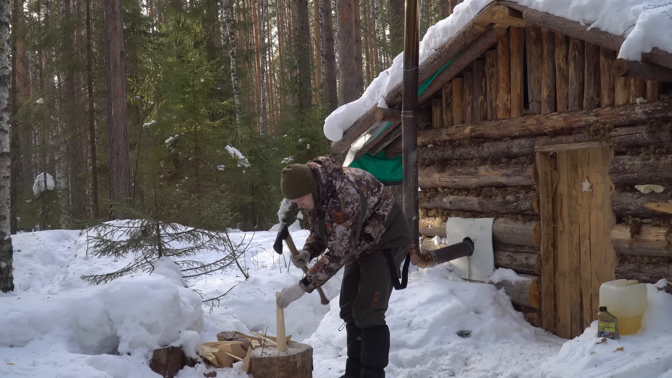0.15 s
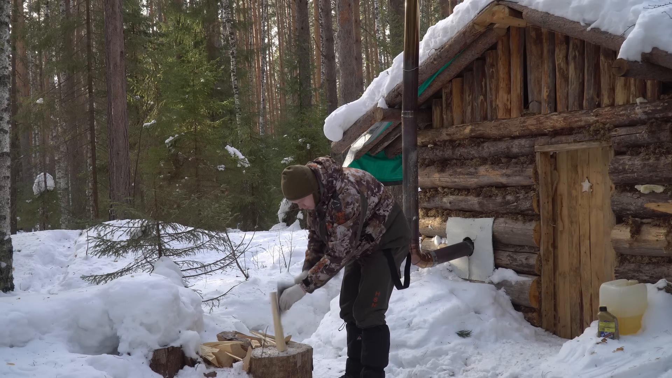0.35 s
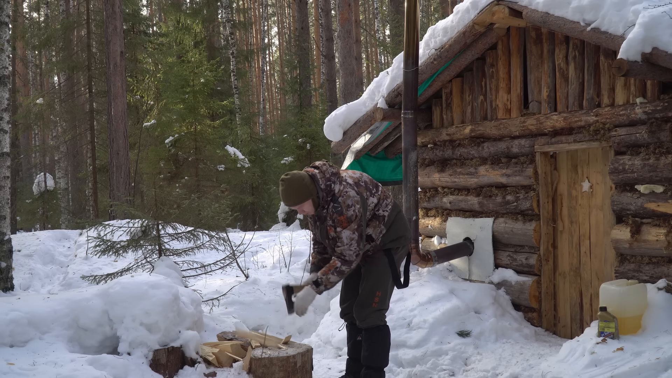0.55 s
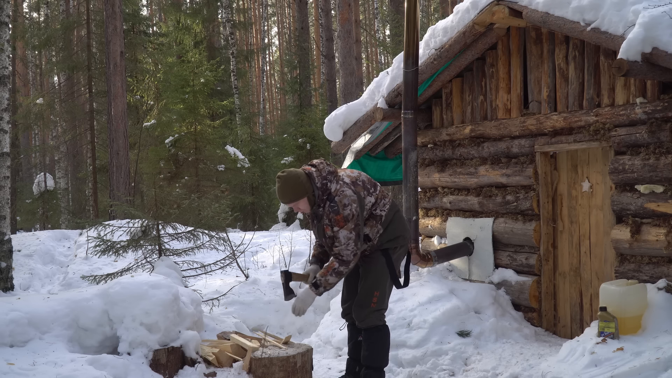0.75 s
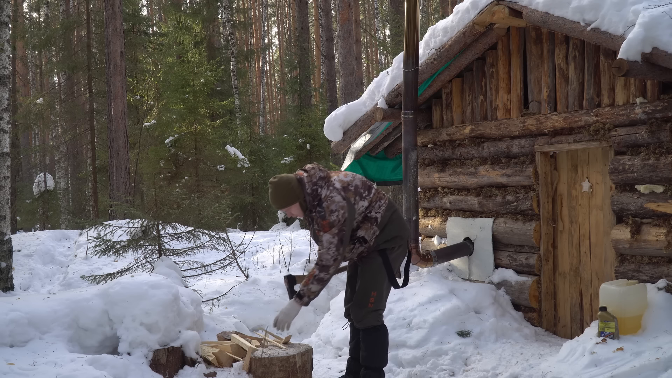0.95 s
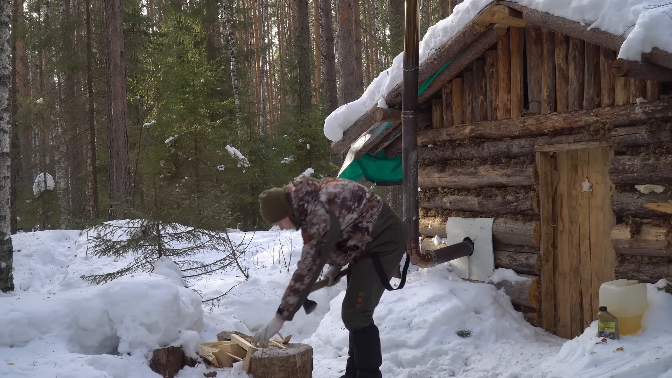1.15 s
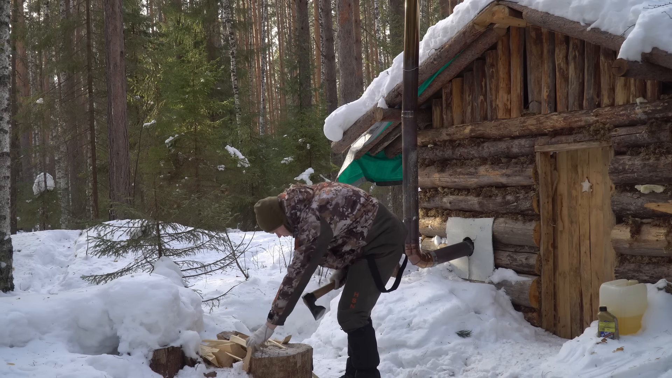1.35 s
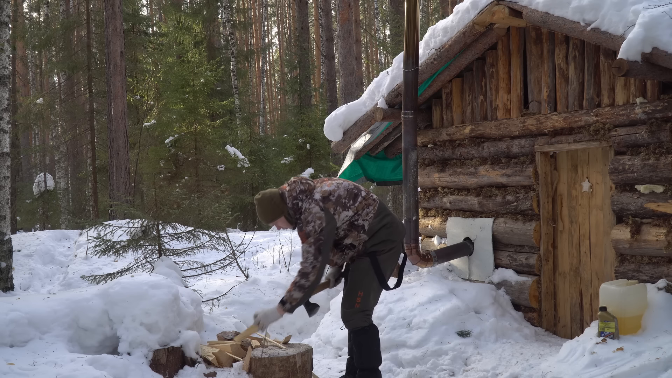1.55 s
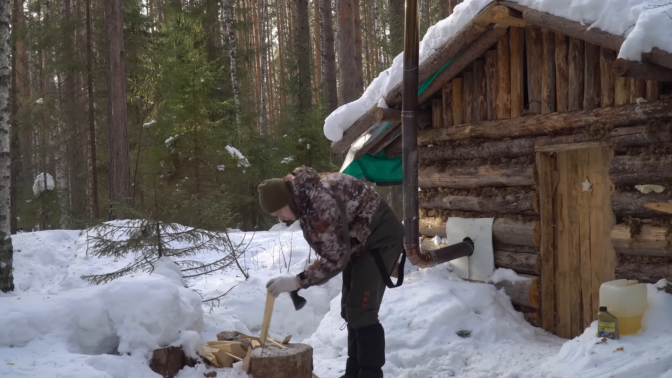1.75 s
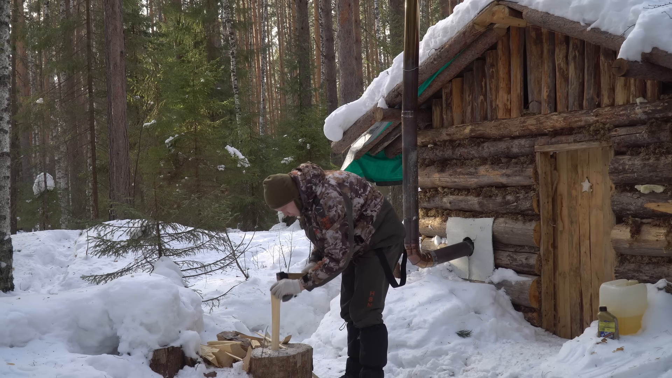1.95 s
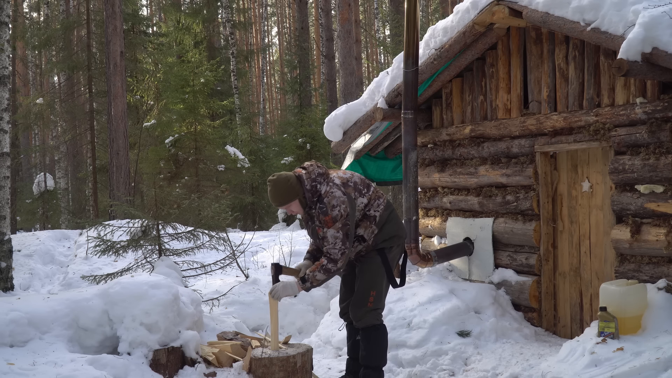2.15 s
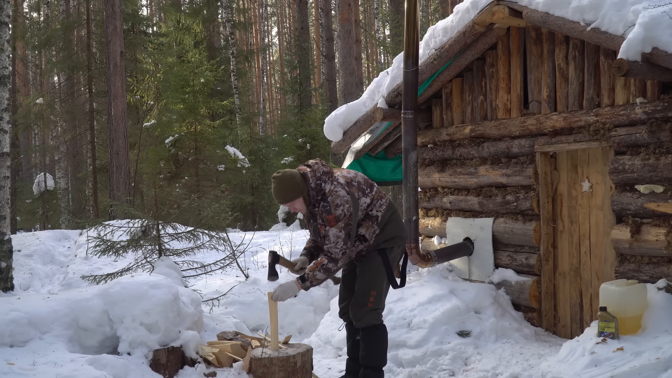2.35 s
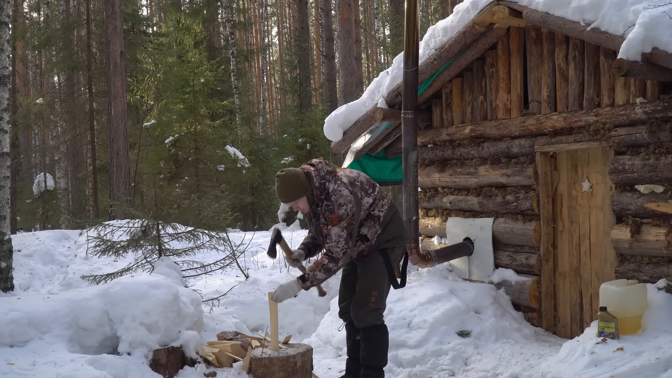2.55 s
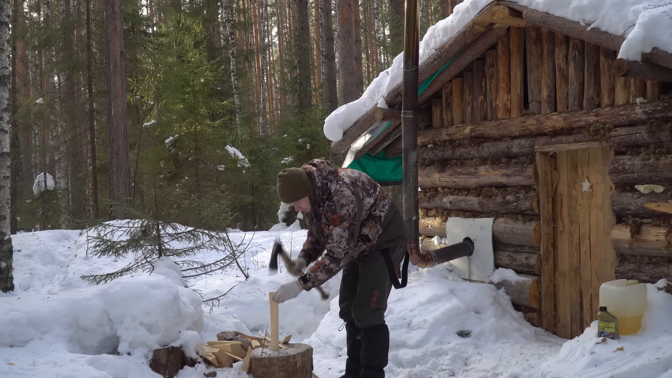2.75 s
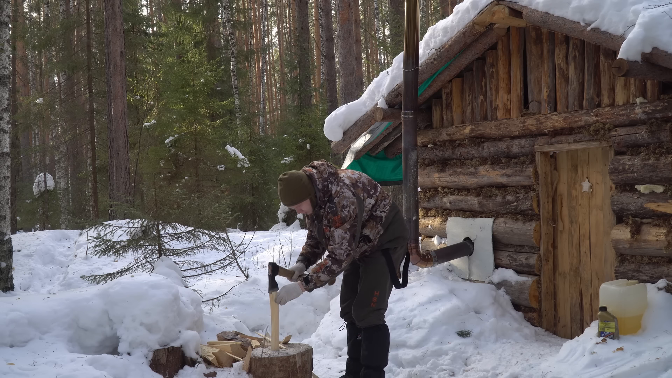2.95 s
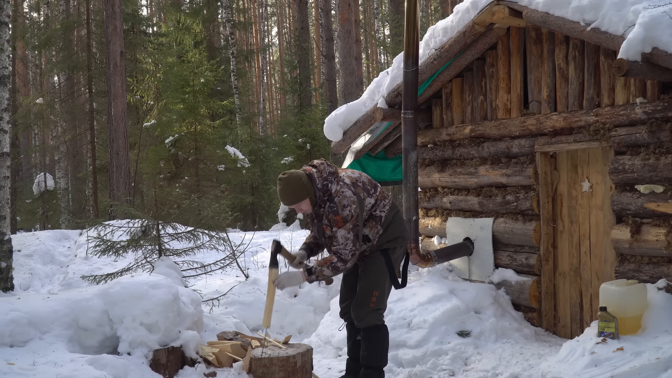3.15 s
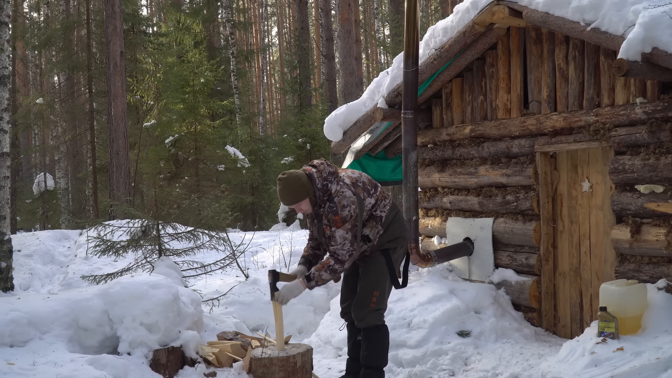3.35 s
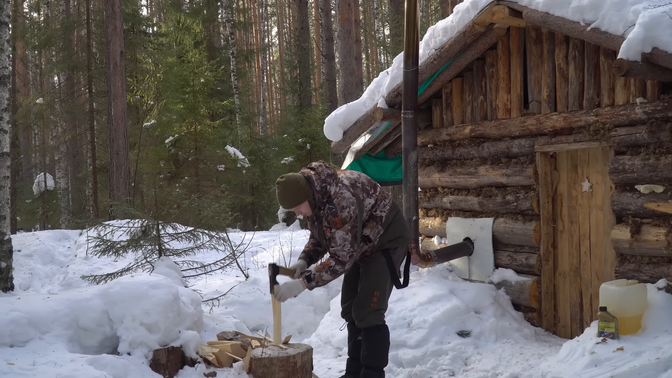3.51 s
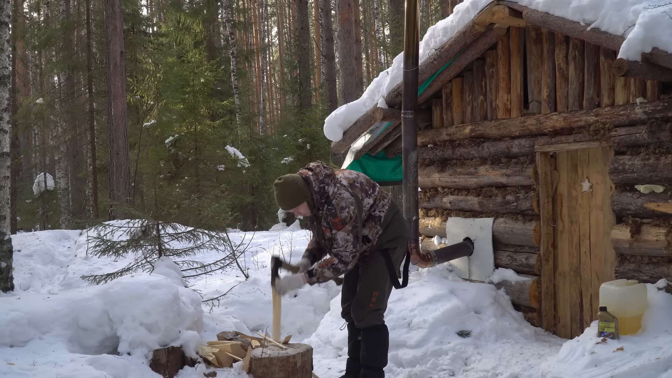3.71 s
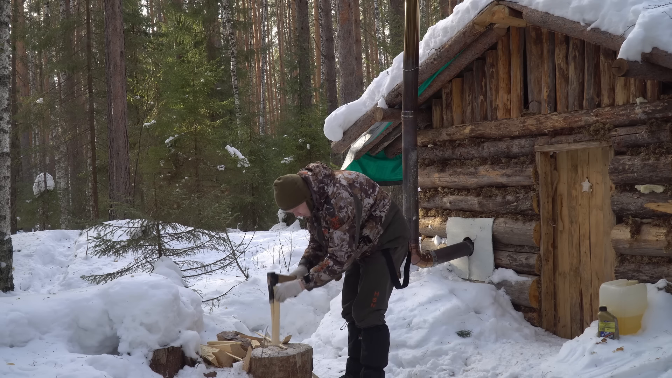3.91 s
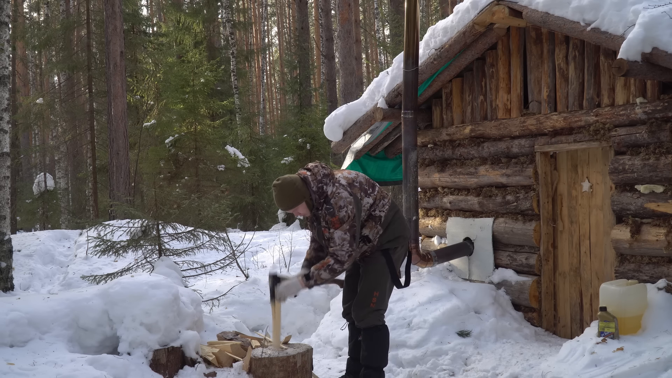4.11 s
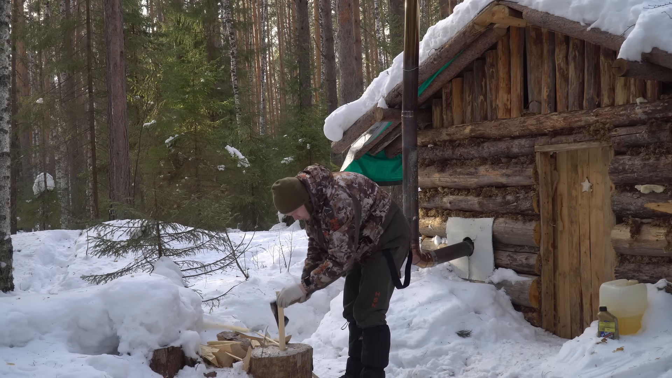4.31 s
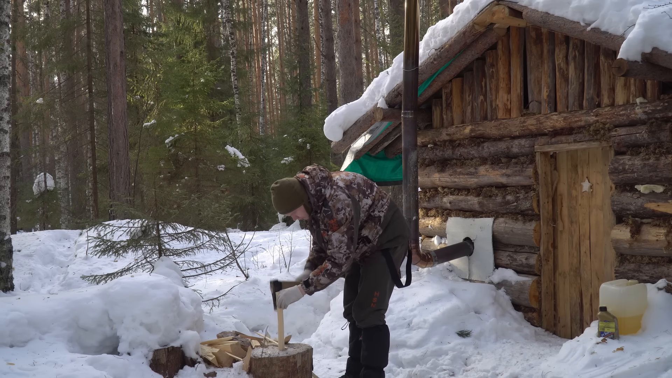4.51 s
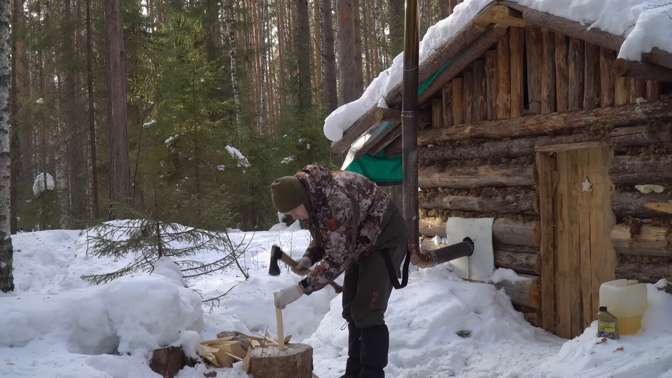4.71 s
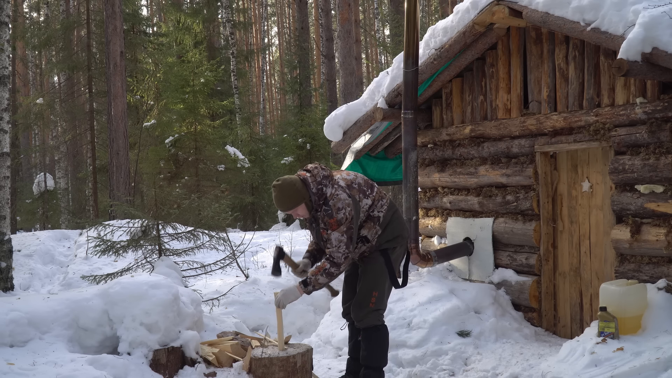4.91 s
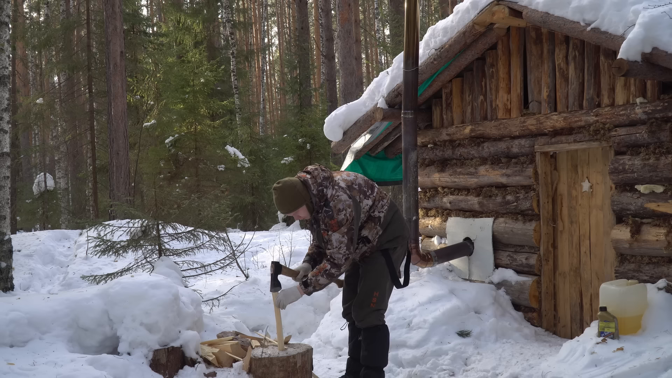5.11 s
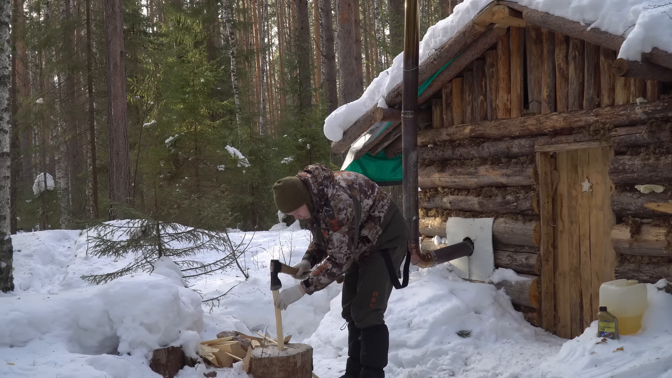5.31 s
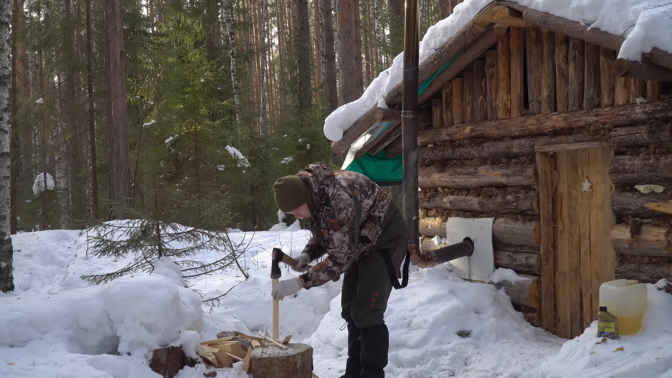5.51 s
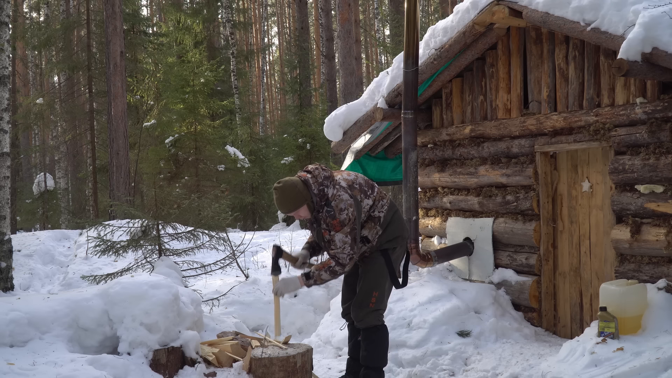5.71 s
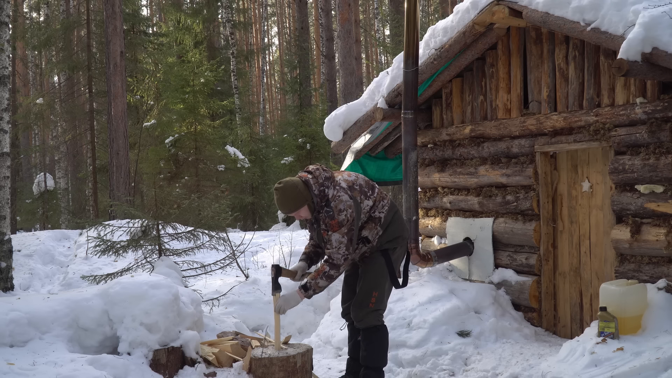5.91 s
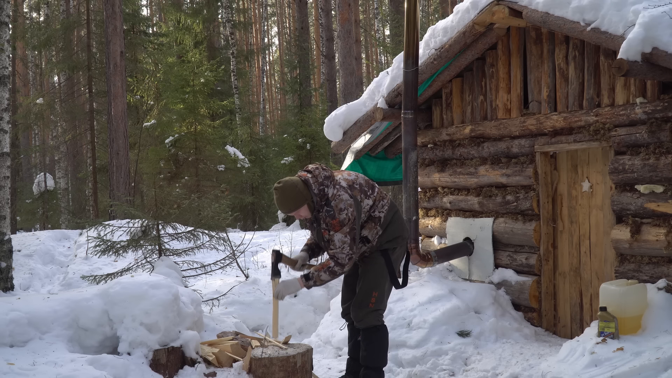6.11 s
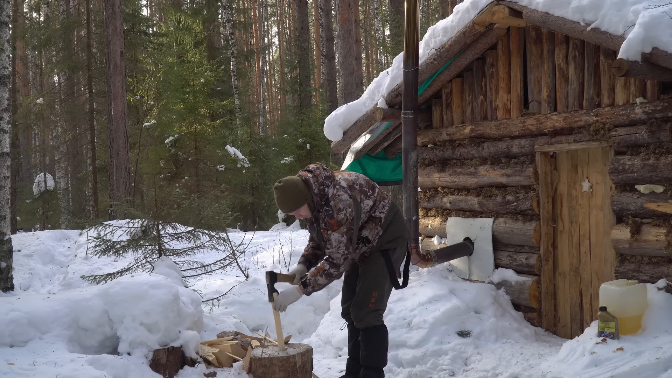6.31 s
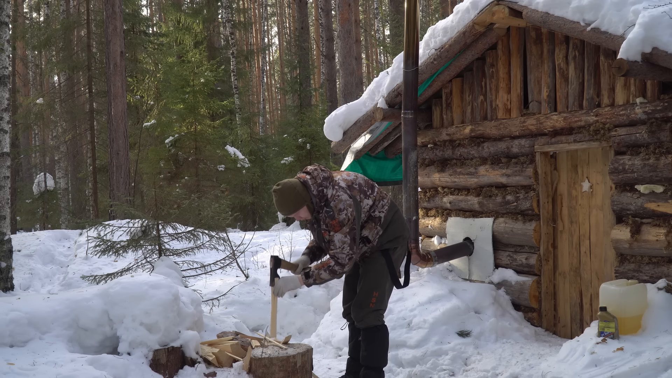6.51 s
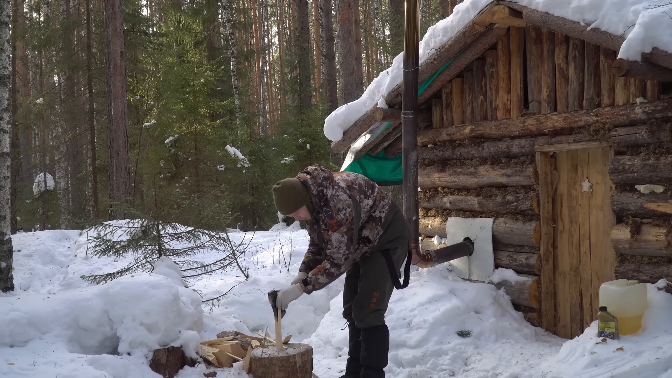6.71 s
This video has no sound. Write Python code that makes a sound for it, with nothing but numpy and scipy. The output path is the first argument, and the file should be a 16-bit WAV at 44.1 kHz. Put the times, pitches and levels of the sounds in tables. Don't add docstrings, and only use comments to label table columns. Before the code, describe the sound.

A still winter forest, with a far soft hush, faint low breeze and the tail of an earlier echo. Slight wood scrapes and clicks open; at 0.4 s a hatchet splits a stick with a dry crack and short woody ring. At 0.7 to 1.1 s pieces land on the pile, clacking and bouncing with clear, hollow notes. Cloth rubs and stiff gloves crease until about 2.3 s, with a small scrape near 1.6 s. Heavy blows come at 2.9, 3.4, 3.85 and 4.2 s: block thuds under sharp fibre snaps, the last bursting apart. Sticks rattle and ring to 4.6 s, followed by a brief scrape. A light, dull tap falls at 5.1 s. Brittle tearing blows hit at 5.9, 6.3 and 6.7 s, with quick extra cracks. Trunks scatter thin echoes after each. The microphone is several steps off.

```python
import sys
import numpy as np
from scipy import signal
from scipy.io import wavfile

SR = 44100
rng = np.random.default_rng(int(sys.argv[2]) if len(sys.argv) > 2 else 0)


def to_wav(sig):
    pcm = np.clip(np.atleast_2d(sig), -1, 1) * 32767
    pcm = np.round(pcm).astype(np.int16)
    wavfile.write(sys.argv[1], SR, pcm.T)


def attenuation_scalar(level_db):
    decades = np.asarray(level_db, float) / 20
    return 10 ** decades


N = 302526

# pitch_hz, level_db (per Hz)
HUSH_SPECTRUM = [(29, -32), (50, -2), (91, -4.5), (167, -5), (284, -2), (362, -1.5), (729, 0),
                 (1960, -12.5), (2490, -21), (5020, -25.5), (7210, -34), (12900, -38.5), (14900, -40.5),
                 (16000, -41)]
HUSH_LEVEL_DB = -54.5
# pitch_hz, level_db (per Hz)
RUSTLE_SPECTRUM = [(1180, -27.5), (2000, 4), (2300, -4), (3460, -3), (6640, -13.5), (13900, -21),
                   (16000, -16.5)]
# time_s, level_db
RUSTLE_LOUDNESS = [(0.0, -69), (0.3, -84), (0.76, -63.5), (0.86, -70), (1.07, -68), (1.28, -64.5),
                   (1.51, -65.5), (1.81, -67), (2.2, -70.5)]
# time_s, level_db
WIND_LOUDNESS = [(0.0, -60), (0.55, -71), (1.03, -68), (2.52, -59), (3.13, -71), (3.59, -57), (4.41, -61.5),
                 (4.79, -53), (5.88, -61), (6.86, -71)]
OLD_ECHO_DB, OLD_ECHO_T60_S = -59.5, 0.65

# start_s, length_s, pitch_hz, width_hz, level_db
SCRAPES = [(0, 0.12, 4150, 250, -66), (0.028, 0.094, 566, 81, -60), (0.193, 0.045, 2600, 200, -67),
           (0.202, 0.13, 3950, 200, -73), (0.282, 0.14, 5400, 300, -89), (1.559, 0.093, 3400, 200, -63.5),
           (1.564, 0.056, 6300, 150, -70), (1.6, 0.084, 5080, 200, -70), (1.638, 0.048, 6200, 200, -75),
           (4.656, 0.19, 1470, 60, -62.5)]

# start_s, click_db, pitch_hz
CHIP_CLICKS = [(0.032, -53, 3320), (0.077, -43.5, 2610), (0.203, -48, 4100), (.228, -55, 2600),
               (0.262, -51.5, 3960), (0.285, -62, 3900), (.333, -54, 3960), (.648, -38.5, 5070),
               (0.8, -41, 4700), (.952, -67, 4640), (1.174, -43, 4370), (1.588, -52, 6200),
               (2.069, -54, 4890), (3.99, -50.5, 4900), (4.595, -51, 5000), (4.61, -52, 6300),
               (4.659, -66, 3560), (4.718, -49, 4500), (5.52, -64, 4440), (6.125, -55, 3920),
               (6.452, -63.5, 4060)]
CHIP_AIR_DB, CHIP_T60_S, CHIP_GROWTH = -7, .032, .03
# start_s, click_db, pitch_hz, clack_db
LANDINGS = [(0.084, -46, 3150, -20), (0.6812, -38, 2650, -24), (0.836, -68, 3300, -10),
            (.891, -49, 3100, -38), (.9768, -63, 3450, -48), (1.08, -53, 3550, -39),
            (4.5063, -55, 3420, -24.5), (4.5476, -46, 2500, -35), (4.557, -67, 2940, -24)]
LANDING_AIR_DB, LANDING_T60_S = -5, 0.026
# start_s, level_db
CREASES = [(.356, -57), (0.765, -49), (1.113, -52), (1.128, -54), (1.312, -57), (1.357, -45), (1.435, -48),
           (1.457, -50), (1.465, -57), (1.632, -54), (2.289, -56), (3.054, -60), (3.196, -63.5),
           (3.796, -52), (3.826, -49), (4.44, -47), (4.512, -50), (5.15, -56), (6.597, -69)]
CREASE_HZ, CREASE_CLICK_DB, CREASE_T60_S = 7000, -6.5, .035

# start_s, peak_db
THICK_STICK_KNOCKS = [
    (.6818, -11),
    (.8274, -33.5),
    (.8345, -40),
    (.8934, -68),
]
THIN_STICK_KNOCKS = [
    (.8352, -22),
    (.9768, -28.5),
    (1.0805, -41.5),
    (1.605, -44.5),
    (4.5065, -43.5),
    (4.5603, -33),
]
SPLIT_STICK_KNOCKS = [
    (4.2376, -20),
    (4.3111, -38),
]
# pitch_hz, level_db, t60_s
THICK_STICK_MODES = [(1051, -7, .155), (1362, -2.5, .07), (1372, -28, .3), (2164, -12, .045),
                     (2681, -16, .045), (3138, -15, .06), (4550, -28, .04), (5071, -29, .05)]
THIN_STICK_MODES = [(1580, -16, .05), (1912, 0, .066), (2455, -20, .04), (2968, -17, .09), (3425, -12, .05),
                    (4550, -21, .04), (5120, -23, .035), (6330, -28, .03)]
SPLIT_STICK_MODES = [(491, -19, 0.17), (1071, -14.5, 0.14), (1314, -1.5, 0.16), (1790, -35, .07),
                     (2435, -5.5, 0.061), (3940, -30, 0.36), (4800, -28, 0.055)]
# (pitch_hz, level_db, t60_s)
SMALL_STICK = [
    [(0.0842, -34), (0.0944, -33)],
    [(673, -14.5, 0.12), (1314, -30, 0.45), (1513, 4, 0.094), (2910, -19, 0.08)],
]
SHORT_STICK = [
    [(.4106, -17), (.4124, -15), (4.5487, -56), (4.554, -38)],
    [(1470, -27, 0.074), (1525, -4, 0.014), (2610, -12.5, 0.019), (3300, -16, 0.022), (4930, -27, 0.029), (1400, -40, 0.22)],
]
STUB = [
    [(4.3111, -52), (4.326, -42), (4.5055, -50), (4.511, -37)],
    [(1065, 2.5, 0.046), (2500, -16, 0.028)],
]
CHIP = [
    [(4.4622, -36), (4.4655, -46)],
    [(1060, -3, .04), (2466, -4, .035), (3900, 0, .03), (5631, -12, .03), (9500, -18, .02)],
]
# start_s, pitch_hz, level_db, t60_s
STICK_RINGS = [(.4108, 2180, -27.5, .03), (.4108, 3220, -24, .022), (.4125, 2600, -25, 0.023),
               (.412, 445, -36, 0.038), (.412, 269, -39.5, 0.049), (.432, 5050, -47, 0.037),
               (.682, 694, -30, .025), (.7, 3190, -58, 0.27), (.9772, 1903, -33.5, 0.071),
               (.9772, 2950, -52, 0.15), (.9772, 3180, -45, 0.047), (1.081, 3450, -47, 0.068),
               (1.081, 1907, -45, .08), (.893, 4550, -54, .03), (.801, 4600, -58, .03),
               (4.5495, 1830, -31, .05), (4.5495, 3440, -54, .05), (4.55, 5030, -49, 0.018),
               (5.074, 610, -31.5, .03), (5.0755, 1810, -30, 0.018), (5.0755, 2880, -38, 0.012),
               (.806, 1051, -43, 0.18), (.806, 1362, -50, 0.053), (.8345, 1051, -28, .13),
               (.836, 745, -35, .08), (.868, 2681, -53, .08), (.868, 3138, -61, .08), (.893, 1051, -43, .08),
               (4.462, 3900, -44, 0.037), (4.478, 2700, -51, 0.095), (4.5065, 1314, -44, 0.055),
               (4.549, 1314, -26.5, 0.063), (4.5608, 1600, -24, 0.022), (4.718, 2700, -56, 0.026)]

# (pitch_hz, level_db, t60_s)
WHOLE_LOG = [
    [(2.8915, -20), (2.894, -19.5)],
    [(620, 1.5, .045), (784, -15, 0.042), (1184, -13, .04), (2160, -12, 0.084)],
]
FIRST_LOG = [
    [(3.4164, -13.5), (3.4207, -23), (3.426, -30), (3.8548, -38), (3.87, -42)],
    [(1725, -9, 0.05), (3548, -2, .035), (4188, -1, 0.035), (4495, -4, .03), (4760, -10, .03), (5190, -6, 0.034)],
]
TAPPED_LOG = [
    [(5.0735, -25.5), (5.0755, -45)],
    [(625, 4, 0.031), (1680, -4, 0.017), (2920, -9, 0.0099)],
]
SECOND_LOG = [
    [(5.8808, -26), (5.8827, -11.5), (6.3422, -15.5), (6.3473, -13), (6.3512, -47)],
    [(3560, -19, 0.033), (3960, -7, 0.016), (4180, -22, 0.018), (5490, -6.5, 0.01)],
]
LAST_LOG = [
    [(6.7133, -23.5), (6.7368, -29), (6.7528, -22.5), (6.7545, -23.5)],
    [(2780, -3, 0.023), (3450, -16, 0.039), (4200, -0.5, 0.039), (4500, -26, .025), (7000, -9.5, 0.033)],
]
# start_s, pitch_hz, level_db, t60_s
BLOW_RINGS = [(.411, 1400, -16.5, .05), (.411, 740, -47.5, 0.024), (2.8953, 1720, -29, 0.038),
              (2.898, 1890, -23, 0.032), (2.8953, 2750, -22.5, 0.033), (2.8953, 4010, -25.5, 0.03),
              (3.414, 447, -43, 0.12), (3.4168, 1180, -23, .03), (3.853, 350, -28.5, 0.04),
              (3.853, 1071, -26, 0.019), (3.8558, 1890, -26, .02), (3.8558, 4850, -25, .018),
              (3.854, 1588, -28, 0.029), (3.8708, 5500, -30, .025), (3.416, 684, -28.5, 0.023),
              (3.4168, 1390, -32, .03), (3.4168, 5420, -22, 0.03), (3.856, 2680, -40, 0.038),
              (3.856, 3070, -25, .03), (3.8708, 2570, -28, 0.024), (3.8708, 4030, -30, .025),
              (4.2377, 2170, -12, 0.017), (4.2377, 4200, -12.5, 0.018), (4.2381, 4820, -15, 0.016),
              (4.2381, 2510, -27.5, 0.093), (4.2381, 2660, -25, 0.031), (4.282, 2500, -39, 0.044),
              (4.2381, 705, -23.5, .02), (5.881, 4000, -25, 0.028), (5.881, 4930, -21, 0.031),
              (5.883, 5480, -21, 0.017), (5.877, 110, -40, 0.078), (6.338, 322, -30, 0.033),
              (6.342, 990, -24, 0.026), (6.348, 1760, -37, 0.035), (6.3445, 3430, -19, 0.017),
              (6.348, 3630, -23.5, .02), (6.3519, 4172, -16, 0.015), (6.3519, 1730, -29, 0.035),
              (6.348, 4689, -27, 0.015), (6.3736, 970, -35, 0.032), (6.3736, 2950, -28, 0.016),
              (6.7125, 460, -28, 0.027), (6.7139, 1020, -29.5, 0.026), (6.7139, 2099, -16.5, 0.013),
              (6.7139, 4500, -22, 0.042), (6.7139, 5380, -17, .015), (6.7125, 727, -41, 0.018),
              (6.7373, 2780, -27, 0.03), (6.7533, 3483, -19, 0.027)]

# start_s, crack_db, split_pitch_hz, stick_shake_db (over the crack), fading_db (per snap)
BLOWS = [
    (0.4117, -20, 2820, -2, 16),
    (2.8941, -14, 3470, 7.5, 8),
    (3.4159, -20, 3700, 7, 1.5),
    (3.8564, -17, 4960, 6, 6.5),
    (4.2371, -12.5, 4050, 3, 10),
    (5.075, -33, 2980, 12.5, 12.5),
    (5.8797, -21, 4460, -8.5, 4),
    (6.3426, -25, 4140, 10.5, 2),
    (6.714, -18.5, 4200, 1, 15),
]
BITE_AHEAD_S, BITE_DB, BITE_PITCH, BITE_AIR_DB, BITE_T60_S = .0024, -8.5, 0.59, -9, .06
CRACK_AIR_DB, CRACK_T60_S = 6, 0.018
SNAP_GAP_S, SNAP_PITCH_RATIO, SNAP_BODY_DB, SNAP_AIR_DB, SNAP_T60_S = .0046, 0.99, -2, -3.5, 0.01
HISS_PER_FADING = -.7
# start_s, crack_db, pitch_hz, air_db (over the crack)
LATE_CRACKS = [(0.433, -42, 5030, 4), (0.4532, -36, 7000, -4), (.457, -37.5, 2600, -6),
               (3.428, -18, 5000, -1), (3.87, -20, 4930, -1), (4.2266, -28.5, 3580, -1),
               (4.246, -38, 5000, -1.5), (4.259, -38, 4000, -1), (4.4614, -31.5, 4250, -8),
               (4.467, -33, 5530, -14), (4.476, -38.5, 5600, -4), (5.8767, -24, 5700, -9),
               (5.888, -15.5, 5560, -8.5), (6.3358, -33, 4500, -7), (6.352, -21, 4070, 0),
               (6.3612, -20, 5450, -2), (6.373, -18.5, 5700, -1), (6.392, -38, 5480, -4),
               (6.7365, -21, 4160, 12), (6.7535, -17, 4270, -15), (6.7558, -19, 4320, 2),
               (6.795, -41, 3520, -16)]
LATE_BODY_DB, LATE_T60_S = -4.5, .018

# start_s, peak_db, upper_modes_db, block_pitch_hz, log_pitch_hz
THUDS = [(0.41, -51.5, 29.5, 238, 737), (0.648, -48, 4, 161, 535), (0.681, -35.5, 14.5, 156, 846),
         (0.834, -47.5, 16, 160, 750), (2.891, -26.5, 14, 198, 641), (3.411, -17.5, -22, 211, 466),
         (3.852, -27, 7.5, 226, 724), (4.227, -29, -16, 211, 910), (4.235, -42.5, 1, 228, 470),
         (5.073, -26.5, 2.5, 172, 627), (5.875, -27, -18, 245, 550), (6.338, -30, 3, 305, 827),
         (6.711, -43.5, 13.5, 234, 745)]
# pitch_ratio, level_db, t60_s
BLOCK_MODES = [(.35, -28, 0.2), (.65, -22, 0.07), (1.0, 5.5, 0.046), (1.6, -10.5, 0.08)]
LOG_MODES = [(0.749, -32, 0.095), (1.0, 18.5, 0.031), (1.35, -8.5, .04)]
CONTACT_MS = 1.185
BLOCK_LAG_S = 0.0018
# start_s, peak_db, low_hz, high_hz
POPS = [(.4112, -16, 1800, 5000), (2.8951, -17, 2500, 9000), (3.8558, -7, 1500, 6000),
        (4.2379, -7, 1500, 9000), (5.8808, -15, 3500, 16000), (5.8828, -15, 3500, 16000),
        (6.3443, -18, 2500, 16000), (6.3478, -14, 2500, 16000), (6.3519, -12, 2500, 16000),
        (6.7136, -6, 1500, 12000), (6.7371, -10, 5000, 16000), (6.7531, -13, 2500, 16000),
        (3.852, -28, 800, 5000), (2.8918, -26, 1500, 6000)]

# pitch_hz, near_db, near_t60_s, far_db, far_t60_s
TREES = [(150, -17.5, 0.13, -48.5, 0.58), (596, -14.5, 0.04, -43.5, 0.72), (2000, -21.5, 0.13, -41.5, 1),
         (4500, -20, 0.11, -39.5, 0.82), (8600, -7, 0.032, -32.5, 0.32), (15000, -18, 0.025, -35.5, .3)]
LOG_ECHO = .4
BLOW_ECHO, LOG_SCATTER = 1.29, 0.97
# start_s, pitch_hz, level_db (rms), t60_s
AFTERGLOW = [(3.43, 3560, -68, 0.56), (3.429, 4200, -58, 0.73), (3.43, 5060, -60, .6),
             (4.25, 3860, -58, 0.97), (5.889, 2760, -57, 0.34), (5.889, 3950, -61, 0.55),
             (5.89, 5480, -61.5, 0.48), (5.89, 3350, -63, 0.46), (4.25, 7450, -64, .6),
             (3.87, 4760, -57, 0.45), (3.87, 3100, -57, .5), (6.37, 3760, -60, 0.49),
             (6.37, 5540, -57, 0.46), (6.76, 2750, -64, 0.26), (6.76, 4120, -54, 0.5),
             (6.76, 4500, -53.5, 0.56), (6.76, 3500, -58, .4), (6.76, 6900, -59, 0.42)]
AFTERGLOW_WIDTH = .025


def rms_one(x):
    return x / np.sqrt(np.mean(x ** 2) + 1e-20)


def peak_one(x):
    return x / np.max(np.abs(x))


def in_time(rows):
    return np.interp(np.arange(N) / SR, *np.transpose(rows))


def at_hz(rows, hz):
    f, *columns = np.transpose(rows)
    return [np.interp(np.log(hz), np.log(f), c) for c in columns]


def band(x, low_hz, high_hz):
    edges = [low_hz, min(high_hz, .45 * SR)]
    return signal.sosfilt(signal.butter(2, edges, "band", fs=SR, output="sos"), x)


def drift(rate_hz):
    r = np.exp(-80 * np.pi * rate_hz / SR)
    white = rng.standard_normal(N // 40 + 2002)
    slow = signal.lfilter([1], [1, -2 * r, r * r], white)[2000:]
    return np.interp(np.arange(N) / 40, np.arange(len(slow)), rms_one(slow - slow.mean()))


def ring(force, hz, t60):
    r = attenuation_scalar(-60 / (max(t60, .002) * SR))
    w = 2 * np.pi * hz / SR
    return signal.lfilter([0, np.sin(w)], [1, -2 * r * np.cos(w), r * r], force + 1e-18)


def add(out, s, piece):
    i = round(s * SR)
    out[i:i + len(piece)] += piece[:N - i]


def banded_noise(spectrum, patchy_db, rate_hz):
    out, together = 0, drift(rate_hz / 4)
    edges = 50 * 2 ** (np.arange(26) / 3)
    white = rng.standard_normal((2, N))
    for k, (low, high) in enumerate(zip(edges, edges[1:])):
        level_db, = at_hz(spectrum, np.sqrt(low * high))
        flicker_db = patchy_db * (1.1 * together + drift(rate_hz))
        out = out + attenuation_scalar(level_db + flicker_db) * band(white[k % 2], low, high)
    return out


def background():
    hush = banded_noise(HUSH_SPECTRUM, patchy_db=-0.23, rate_hz=0.67)
    hush = attenuation_scalar(HUSH_LEVEL_DB) * hush / np.std(band(hush, 120, 3000))

    folds = attenuation_scalar(3.5 * drift(45.0))
    rustle = band(folds * banded_noise(RUSTLE_SPECTRUM, patchy_db=-1.0, rate_hz=44.0), 1500, 17000)
    rustle = attenuation_scalar(in_time(RUSTLE_LOUDNESS)) * rms_one(rustle)

    echo_fade = attenuation_scalar(OLD_ECHO_DB - 60 * np.arange(N) / SR / OLD_ECHO_T60_S)
    old_echo = echo_fade * rms_one(band(rng.standard_normal(N), 2100, 3700))

    gusts = band(band(rng.standard_normal(N), 26, 50), 21, 60)
    breeze = attenuation_scalar(in_time(WIND_LOUDNESS) - 3.5 + 0.58 * drift(0.91)) * rms_one(gusts)
    return hush + rustle + old_echo + breeze


def scrapes():
    out = np.zeros(N)
    for s, length, hz, width_hz, db in SCRAPES:
        size = round(length * SR)
        slips = attenuation_scalar(2.5 * np.repeat(rng.standard_normal(100), 300)[:size])
        rub = ring(slips * rng.standard_normal(30000)[:size], hz, 6.2 / width_hz)
        add(out, s, attenuation_scalar(db) * rms_one(rub) * np.hanning(size) ** 0.18)
    return out


def cracks(rows, rough_db, cycles, tone, body_trim_db, quick):
    out, t = np.zeros(N), np.arange(3000) / SR
    for s, split_db, hz, body_db, air_db, t60 in rows:
        uneven = attenuation_scalar(rough_db * np.minimum(rng.exponential(1, len(t)), 3.0))
        size = uneven * rng.standard_normal(len(t))
        fade_db = -60 * t / np.clip(t60, .004, .07)
        snaps = size * attenuation_scalar(fade_db)
        ringing = peak_one(band(ring(snaps, hz, cycles / hz), 0.32 * hz, 2.25 * hz))
        bare = peak_one(band(snaps, 2400, 4500))
        split = peak_one(tone * ringing + 0.23 * bare)
        body = peak_one(band(snaps, 1000, 2400))
        hiss = size * (attenuation_scalar(quick * fade_db) + attenuation_scalar(-19.5 + .6 * fade_db))
        air = peak_one(band(hiss, 8100, 14260))
        add(out, s, attenuation_scalar(split_db) * split + attenuation_scalar(body_db + body_trim_db) * body + attenuation_scalar(air_db) * air)
    return out


def clicking():
    rows = []
    for s, db, hz, clack_db in LANDINGS:
        rows.append((s, db, hz, clack_db, db + LANDING_AIR_DB, LANDING_T60_S))
    for s, db, hz in CHIP_CLICKS:
        t60 = CHIP_T60_S * np.exp(CHIP_GROWTH * (db + 53.5))
        rows.append((s, db, hz, db, db + CHIP_AIR_DB, t60))
    for s, db in CREASES:
        rows.append((s, db + CREASE_CLICK_DB, CREASE_HZ, db - 9, db, CREASE_T60_S))
    return rows


def forest(x):
    t, answer = np.arange(SR) / SR, 0
    edges = 60 * 2 ** (np.arange(18) / 2)
    for low, high in zip(edges, edges[1:]):
        near_db, near_t60, far_db, far_t60 = at_hz(TREES, np.sqrt(low * high))
        near = attenuation_scalar(near_db - 60 * t / near_t60)
        far = attenuation_scalar(far_db - 60 * t / far_t60) * np.minimum(t / 0.046, 1)
        answer = answer + (near + far) * band(rng.standard_normal(SR), low, high) * (t > .004)
    return signal.fftconvolve(x, 0.11 * answer)[:N]


def stick(knocks, modes, longest_s, spread_db=-2.0, contact_ms=0.017):
    out, t = np.zeros(N), np.arange(16000) / SR
    click = t * np.exp(-t * 1000 / contact_ms)
    for s, peak_db in knocks:
        for hz, db, t60 in modes:
            level = attenuation_scalar(peak_db + db + spread_db * rng.standard_normal())
            add(out, s, level * peak_one(ring(click, hz, min(t60, longest_s))))
    return out


def tearing():
    rows = []
    for s, db, hz, body_db, fading_db in BLOWS:
        hiss_db = db + HISS_PER_FADING * fading_db
        rows.append((s - BITE_AHEAD_S, db + BITE_DB, hz * BITE_PITCH,
                     db + body_db + BITE_DB, hiss_db + BITE_AIR_DB, BITE_T60_S))
        rows.append((s, db, hz, db + body_db, hiss_db + CRACK_AIR_DB, CRACK_T60_S))
        for k in 1, 2, 3, 4:
            left_db = db - fading_db * k
            snap_s = s + SNAP_GAP_S * (k + 0.14 * rng.standard_normal())
            rows.append((snap_s, left_db, hz * SNAP_PITCH_RATIO ** k,
                         left_db + body_db + SNAP_BODY_DB * k, left_db + SNAP_AIR_DB, SNAP_T60_S))
    for s, db, hz, air_db in LATE_CRACKS:
        rows.append((s, db, hz, db + LATE_BODY_DB, db + air_db, LATE_T60_S))
    return rows


def thuds():
    out, t = np.zeros(N), np.arange(12000) / SR
    push = np.sin(np.pi * np.minimum(t * 1000 / CONTACT_MS, 1))
    for s, peak_db, upper_db, block_hz, log_hz in THUDS:
        block = sum(attenuation_scalar(db + rng.normal(0, 1)) * ring(push, ratio * block_hz, t60)
                    for ratio, db, t60 in BLOCK_MODES)
        log = sum(attenuation_scalar(db) * ring(push, ratio * log_hz, t60) for ratio, db, t60 in LOG_MODES)
        add(out, s + BLOCK_LAG_S, attenuation_scalar(peak_db) * peak_one(block))
        add(out, s, -attenuation_scalar(peak_db + upper_db) * peak_one(log))
    return out


def lone_rings(rows):
    out, click = np.zeros(N), np.arange(8000) == 0
    for s, hz, db, t60 in rows:
        add(out, s, attenuation_scalar(db) * ring(click, hz, t60))
    return out


def pops():
    out, click = np.zeros(N), 1. * (np.arange(400) == 0)
    for s, db, low_hz, high_hz in POPS:
        add(out, s, -attenuation_scalar(db) * peak_one(band(click, low_hz, high_hz)))
    return out


def scatter(x):
    edges, out = 120 * 2 ** (np.arange(22) / 3), 0
    white = rng.standard_normal((2, N))
    for k, (low, high) in enumerate(zip(edges, edges[1:])):
        near_db, near_t60, far_db, far_t60 = at_hz(TREES, np.sqrt(low * high))
        power = np.roll(band(x, low, high) ** 2, 180) + 1e-18
        tail = sum(signal.lfilter([attenuation_scalar(2 * db)], [1, -attenuation_scalar(-120 / (t60 * SR))], power)
                   for db, t60 in ((near_db, near_t60), (far_db, far_t60)))
        out = out + np.sqrt(tail) * rms_one(band(white[k % 2], low, high))
    return 0.07 * out


def afterglow():
    out, t = np.zeros(N), np.arange(20000) / SR
    for s, hz, db, t60 in AFTERGLOW:
        white = rng.standard_normal(len(t))
        noise = band(white, hz * (1 - AFTERGLOW_WIDTH), hz * (1 + AFTERGLOW_WIDTH))
        add(out, s, attenuation_scalar(db - 60 * t / t60) * np.minimum(t / .015, 1) * rms_one(noise))
    return out


def scene():
    loose = ((THICK_STICK_KNOCKS, THICK_STICK_MODES), (THIN_STICK_KNOCKS, THIN_STICK_MODES),
             (SPLIT_STICK_KNOCKS, SPLIT_STICK_MODES), SHORT_STICK, SMALL_STICK, STUB, CHIP)
    logs = WHOLE_LOG, FIRST_LOG, TAPPED_LOG, SECOND_LOG, LAST_LOG
    chips = cracks(clicking(), rough_db=5.5, cycles=25.0, tone=0.4, body_trim_db=-12.5, quick=1.4)
    sticks = sum(stick(*one, longest_s=.45) for one in loose) + lone_rings(STICK_RINGS)
    held = sum(stick(*one, longest_s=.038) for one in logs) + lone_rings(BLOW_RINGS)
    splits = cracks(tearing(), rough_db=-2.0, cycles=12.0, tone=0.48, body_trim_db=-8.0, quick=1.7)
    blows = splits + thuds() + pops()
    wood = band(blows + chips + sticks + held, 55, 19000)
    echo = forest(chips + sticks + LOG_ECHO * held) + scatter(BLOW_ECHO * blows + LOG_SCATTER * held)
    return (wood + echo + scrapes() + background() + afterglow())[None]


def roll_off(x):
    return signal.sosfilt(signal.butter(12, 16990, fs=SR, output="sos"), x)


def record(dry):
    rounded = 1.6 * np.tanh(dry / 1.6)
    top_cut = signal.cheby2(12, 70, 17000, fs=SR, output="sos")
    return roll_off(signal.sosfilt(top_cut, rounded))


dry = scene()
out = record(dry)
to_wav(out)
```